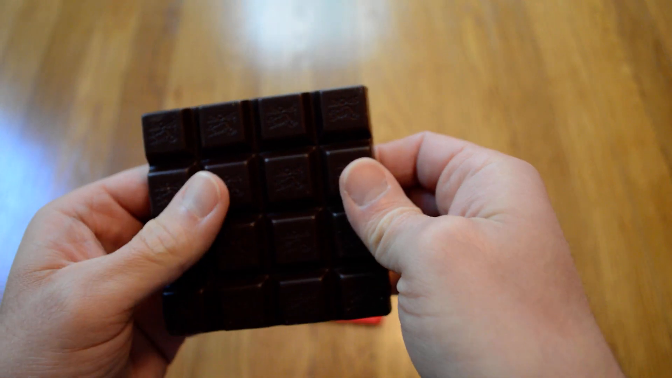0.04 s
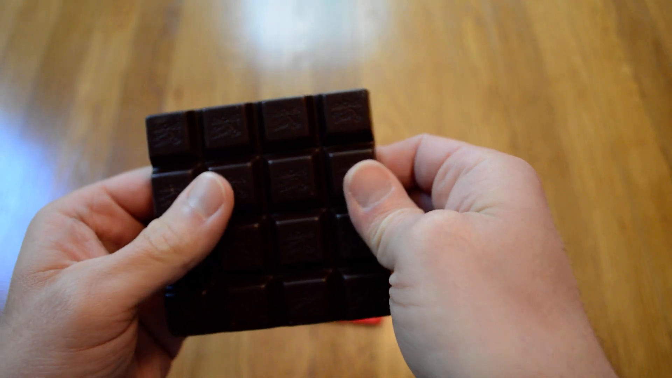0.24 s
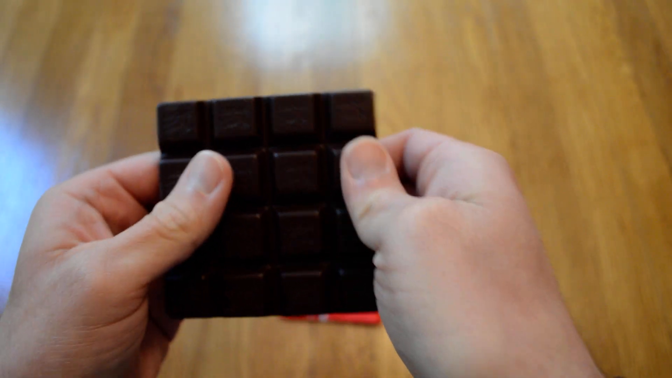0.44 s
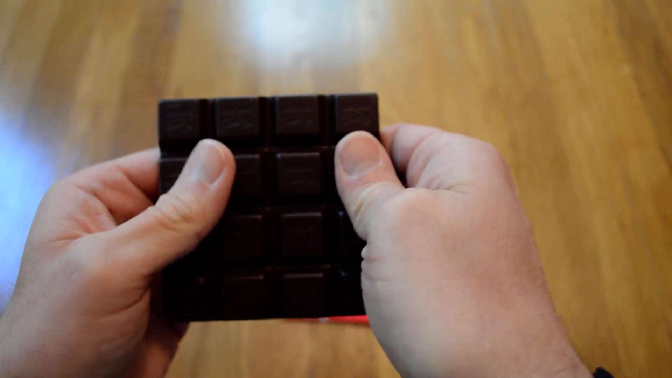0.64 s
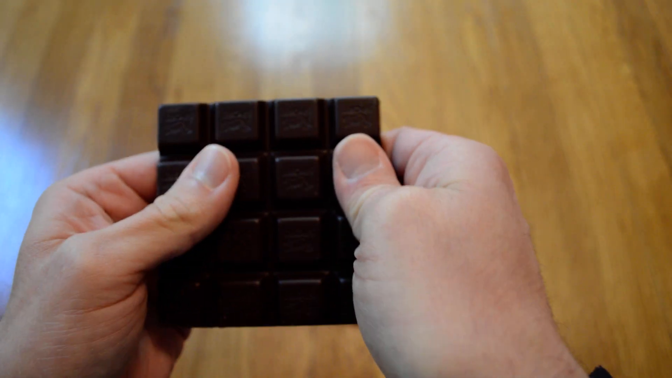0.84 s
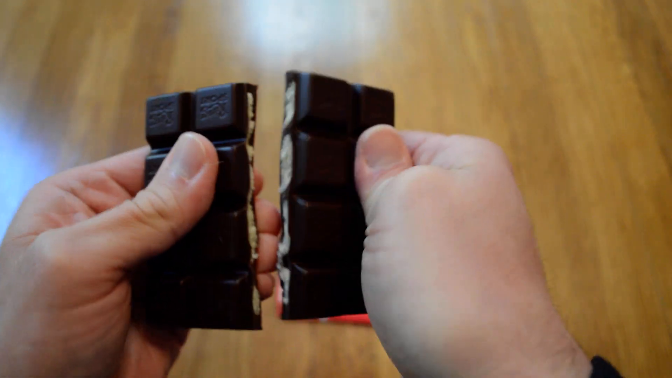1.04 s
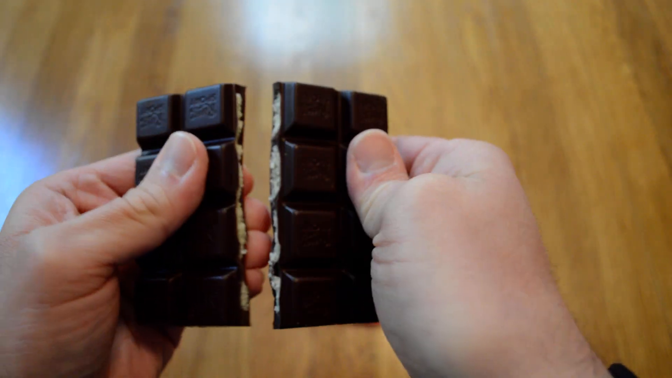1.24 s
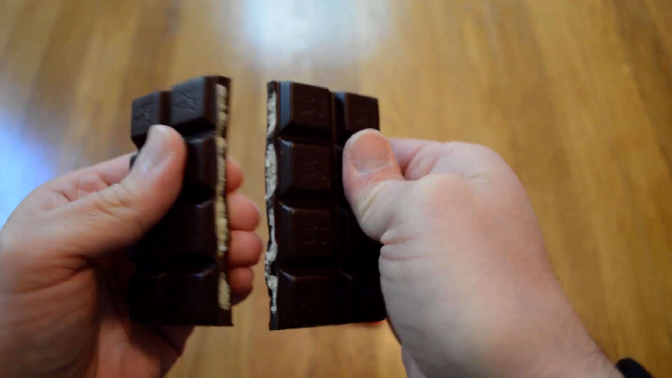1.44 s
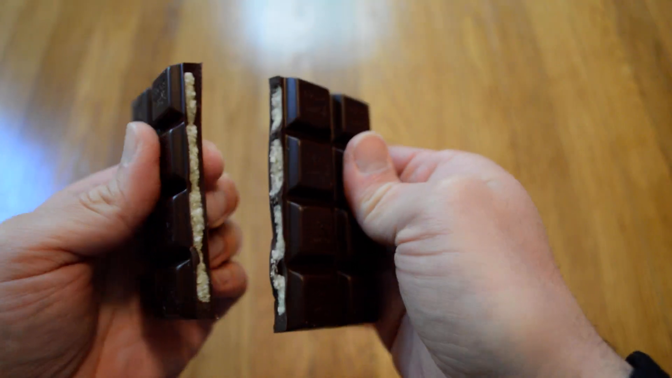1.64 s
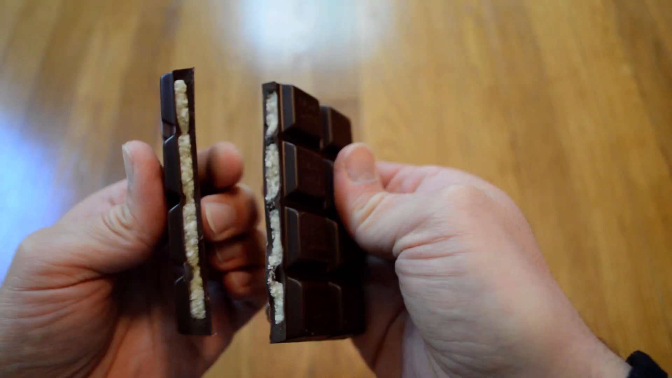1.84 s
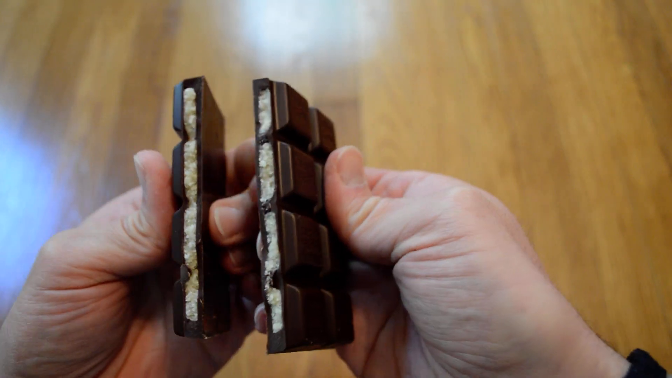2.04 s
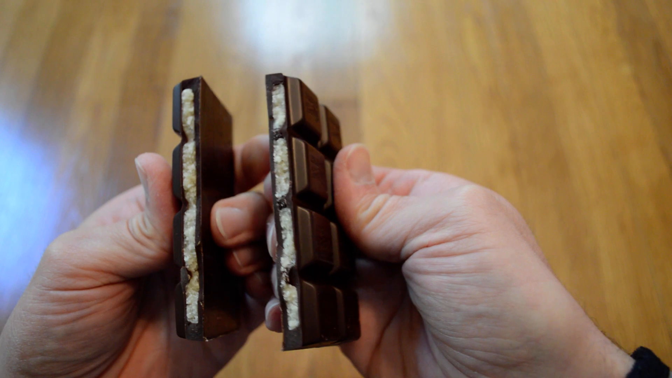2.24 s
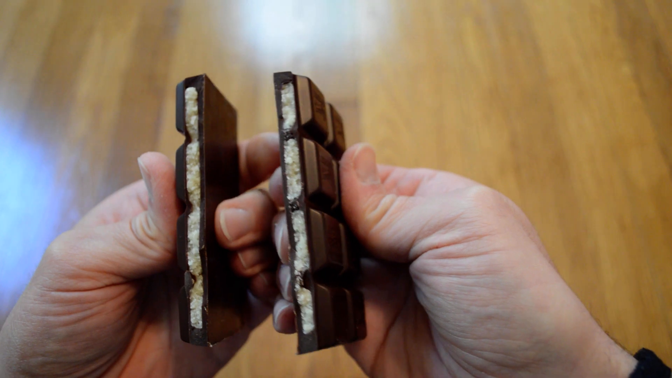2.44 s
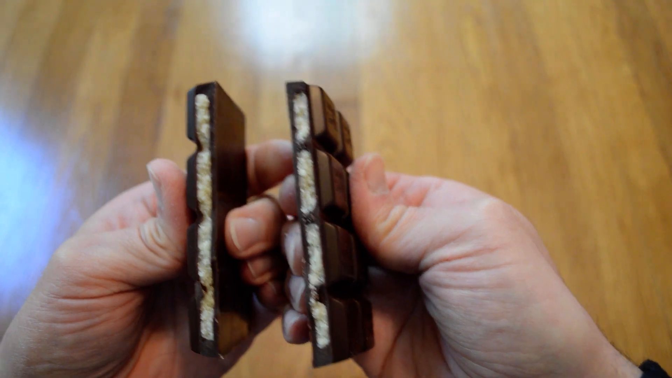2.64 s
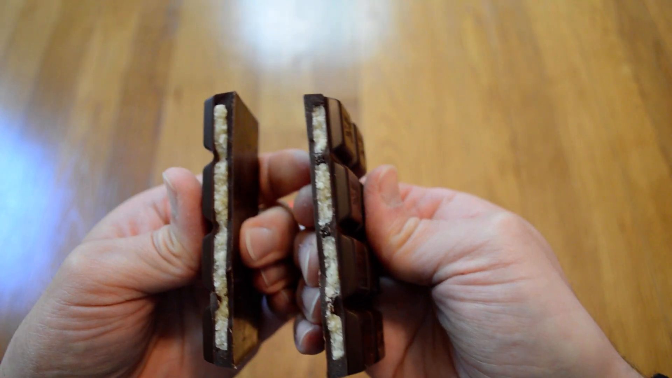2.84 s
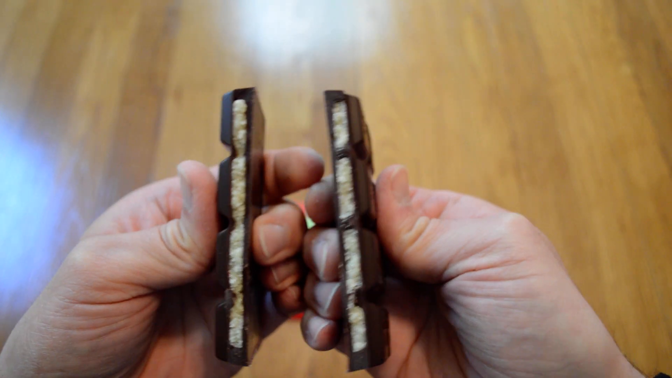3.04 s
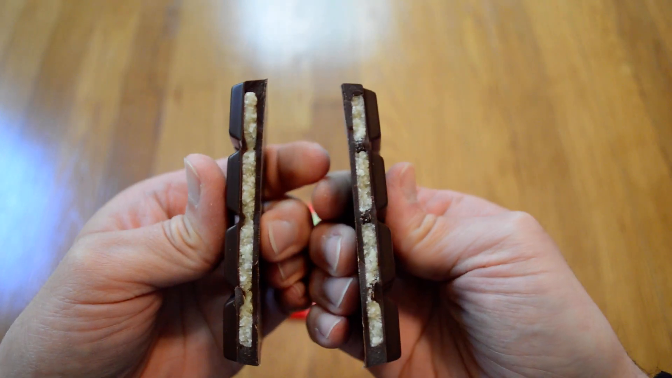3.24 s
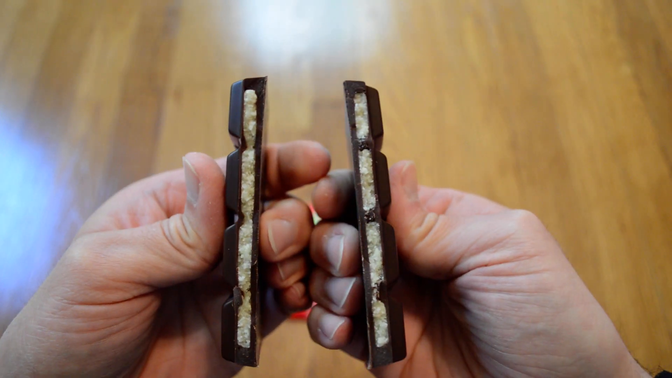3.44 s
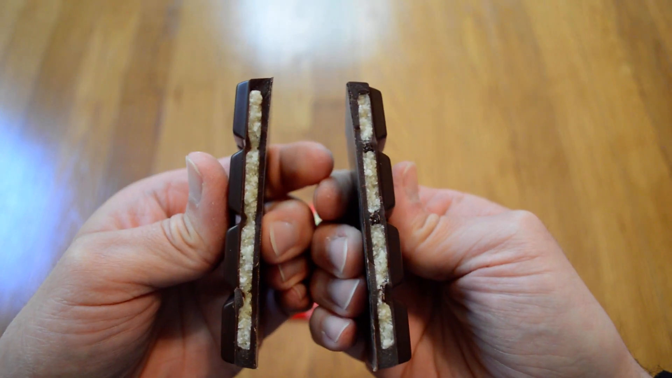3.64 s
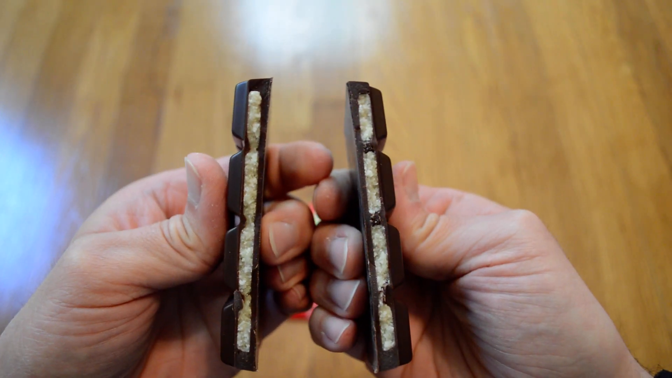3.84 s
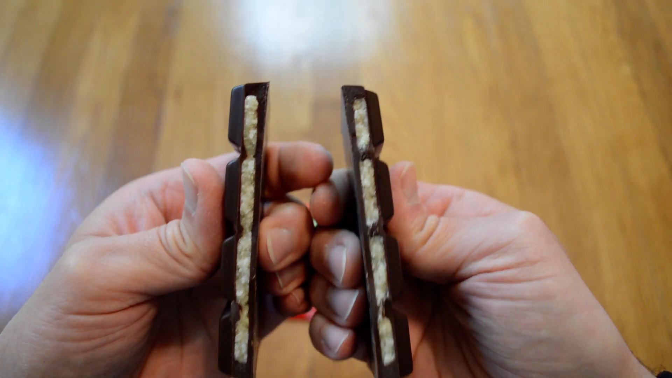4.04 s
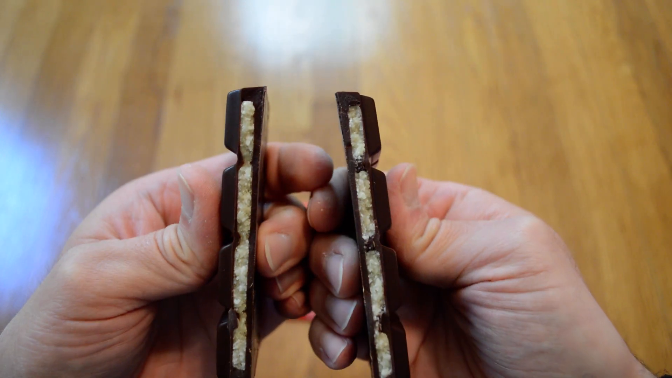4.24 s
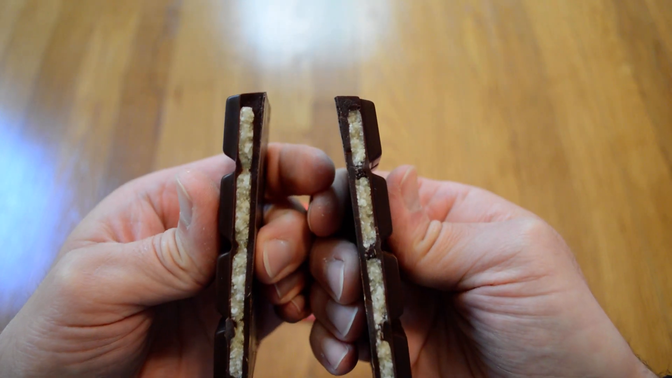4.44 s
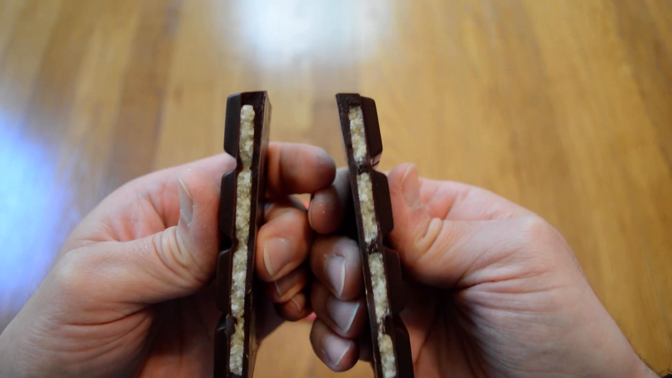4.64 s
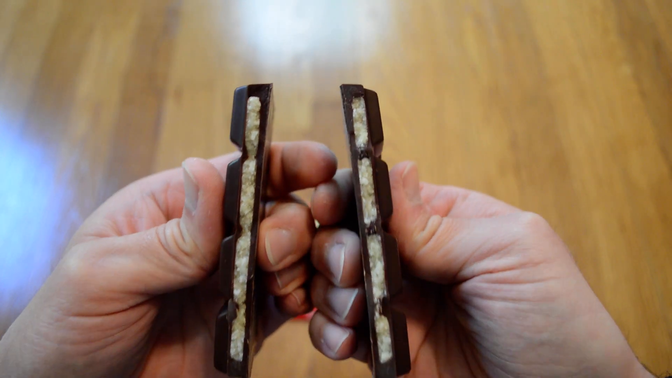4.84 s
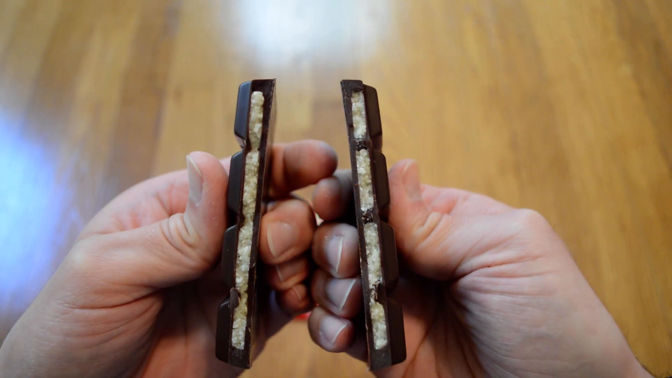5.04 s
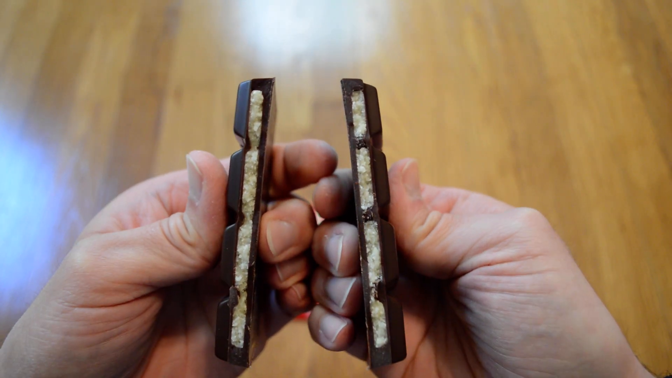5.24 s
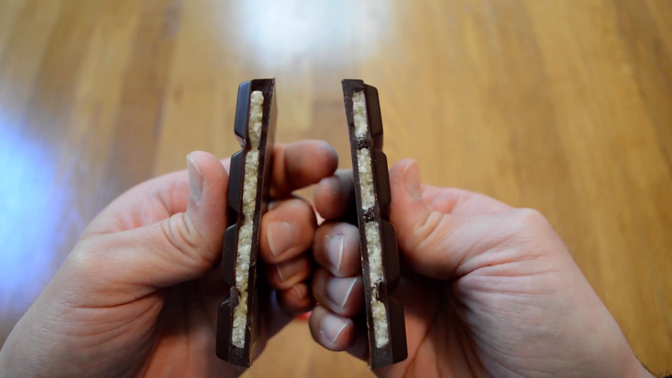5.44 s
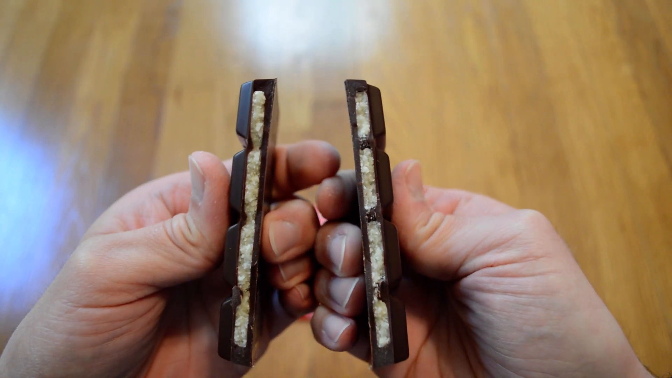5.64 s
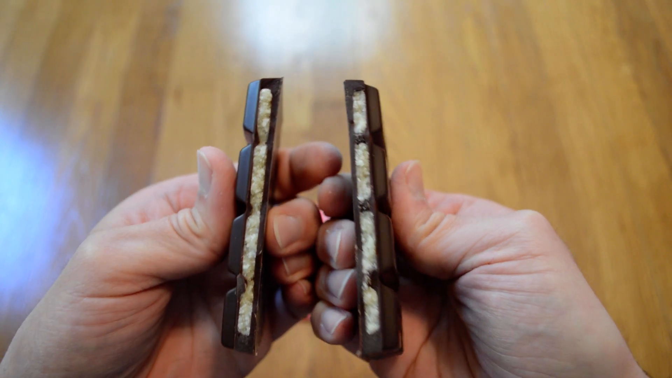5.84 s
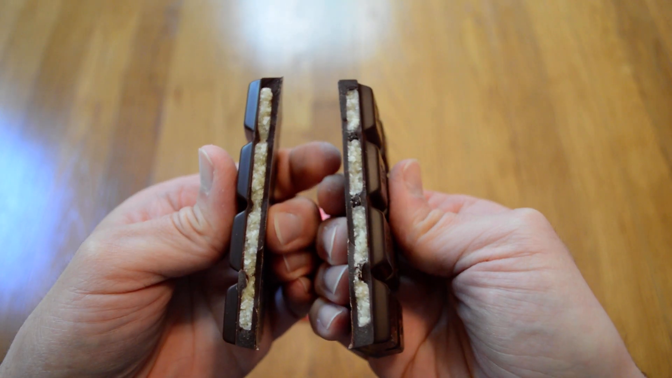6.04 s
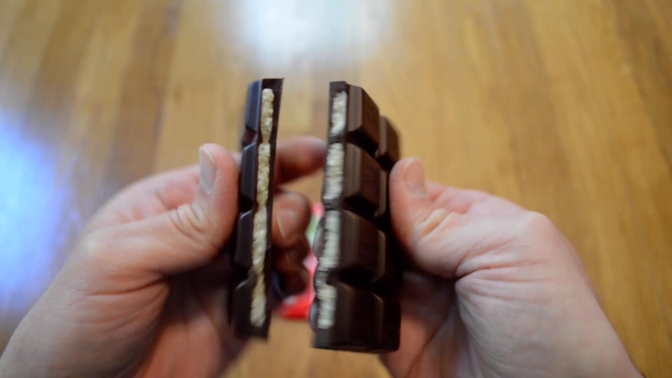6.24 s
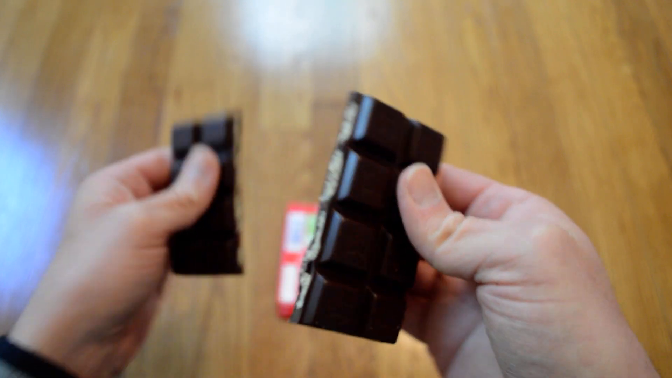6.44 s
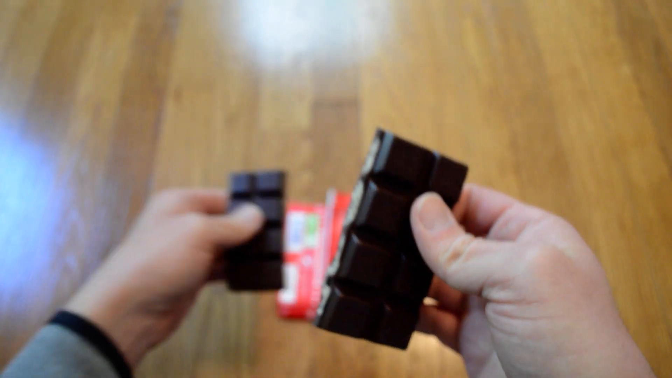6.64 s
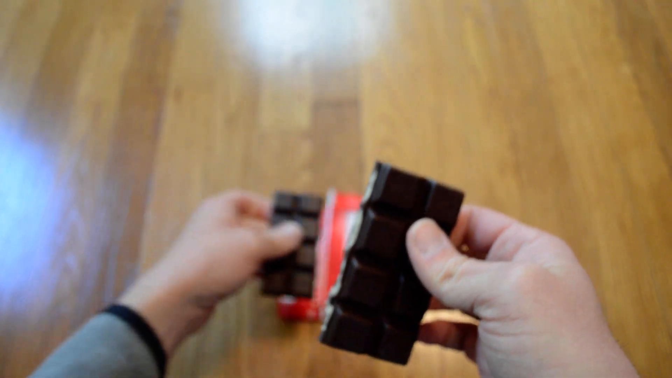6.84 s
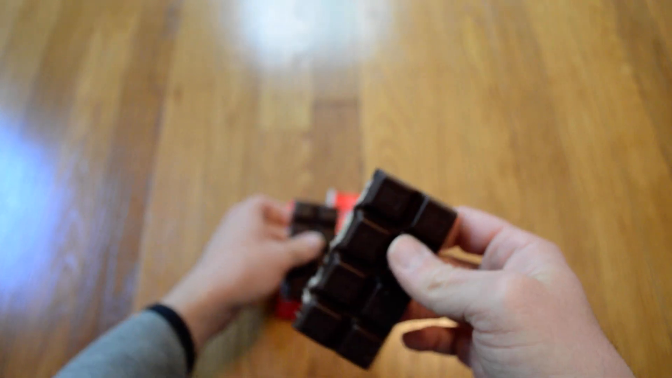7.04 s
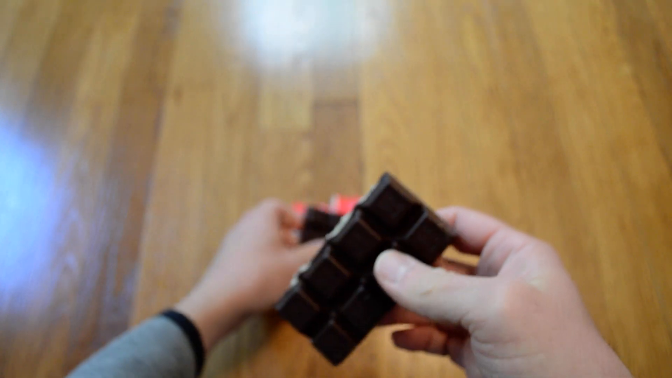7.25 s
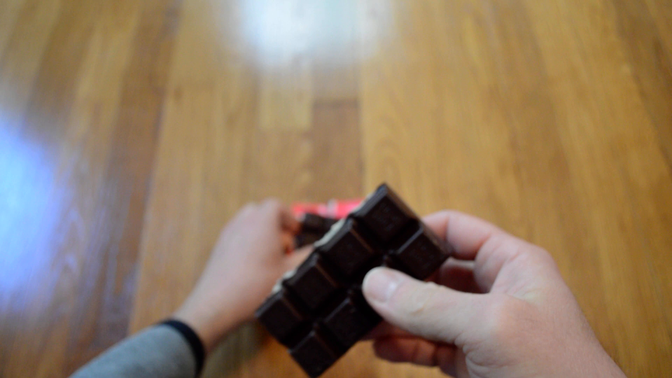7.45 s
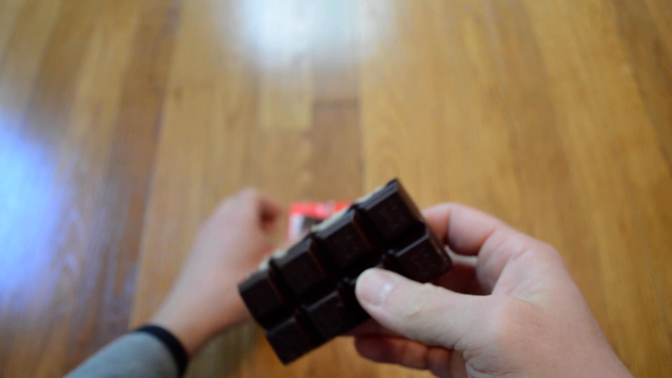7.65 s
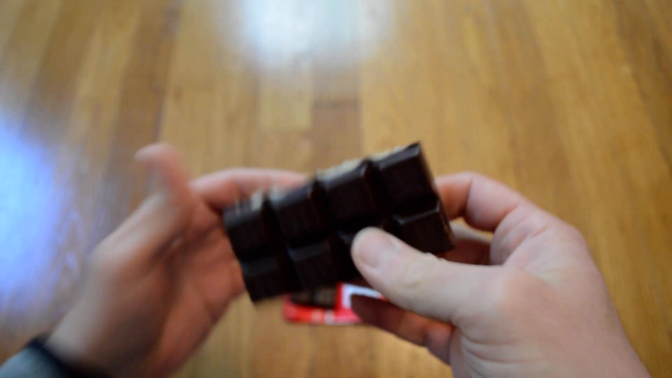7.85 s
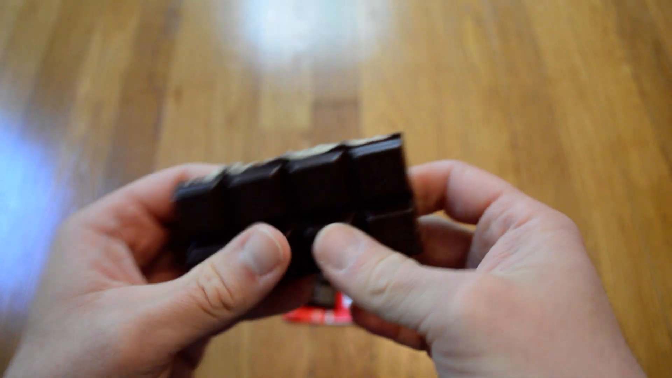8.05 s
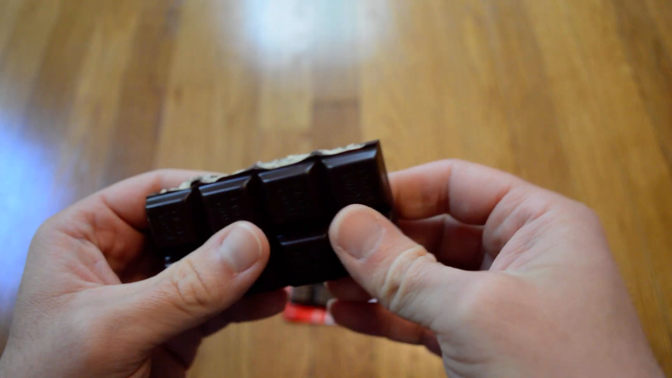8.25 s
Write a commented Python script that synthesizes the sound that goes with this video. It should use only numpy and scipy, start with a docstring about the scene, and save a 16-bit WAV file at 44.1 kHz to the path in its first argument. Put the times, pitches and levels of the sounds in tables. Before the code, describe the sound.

A chocolate bar snaps with one sharp crack, then a piece clacks down on its wrapper on a wooden table, over a faint motor hum.

```python
"""A fridge-like motor hums and whirrs throughout in a small room that answers each hit.
Near 1 s two hands bend a filled chocolate bar close to the microphone: it ticks, then snaps with one
sharp crack; a faint tick follows at 2.6 s. Near 7 s a sleeve swishes as one half is put down on its
wrapper on a wooden table, where it clacks, crinkles the wrapper, slides and rocks to rest.
The arm draws back, and two last faint ticks come just after 8 s."""
import sys
import numpy as np
from scipy import signal
from scipy.fft import rfft, irfft
from scipy.io import wavfile

SR = 44100
rng = np.random.default_rng(int(sys.argv[2]) if len(sys.argv) > 2 else 0)


def output_pcm(signal):
    """Save a mono or channel-first signal as 16-bit PCM at the path in sys.argv[1].

    Samples are clipped to [-1, 1] before scaling.
    """
    pcm = np.clip(np.atleast_2d(signal).T, -1, 1) * 32767
    wavfile.write(sys.argv[1], SR, np.round(pcm).astype(np.int16))


N = 366471
T = np.arange(N) / SR
RING_T = T[:SR // 8]
FREQS = np.maximum(np.arange(N // 2 + 1) * SR / N, 1)


def undb(db):
    """Decibels to gain."""
    return 10 ** (np.asarray(db) / 20)


def unit(x):
    """Scale to the energy of 1 ms at full level."""
    return x / np.sqrt(np.sum(x ** 2) * 1000 / SR)


def add(track, t_s, x):
    """Mix x in at t_s."""
    i = int(t_s * SR)
    track[i:i + len(x)] += x[:N - i]


def cut(x, hz, kind, order=2):
    """Low-pass or high-pass."""
    return signal.sosfilt(signal.butter(order, hz, kind, fs=SR, output="sos"), x)


def contour(points):
    """Gain per frequency from (f/Hz, level/dB) points."""
    hz, db = np.transpose(points)
    return undb(np.interp(np.log(FREQS), np.log(hz), db))


def noise(gain):
    """Noise of given amplitude per root Hz."""
    return irfft(rfft(rng.standard_normal(N)) * gain, N) * np.sqrt(SR / 2)


def walk(rate_hz):
    """Smooth random curve, rms 1."""
    x = noise(np.exp(-.5 * (FREQS / rate_hz) ** 2))
    return (x - x.mean()) / x.std()


def ticks(low_hz, high_hz, spread_db=5, limit_db=17):
    """Dense band-limited ticks of uneven size, rms 1."""
    x = rng.choice([-1, 1], N) * undb(np.minimum(spread_db * rng.exponential(size=N), limit_db))
    x = cut(cut(x, low_hz, "high", order=3), high_hz, "low", order=4)
    return x / x.std()


def tone(rms_db, cycles):
    """Sine at a given rms level."""
    return np.sqrt(2) * undb(rms_db) * np.sin(2 * np.pi * cycles)


def mode(hz, db, t60_s, t=RING_T):
    """One damped sine."""
    return undb(db - 60 * t / t60_s) * np.sin(2 * np.pi * hz * t)


def ring(modes, damping=1):
    """Modes struck together, sign flipping by pairs; damping blurs the peaks."""
    return unit(sum((-1) ** (k // 2) * mode(hz, db, t60_s / damping)
                    for k, (hz, db, t60_s) in enumerate(modes)))


def contact(x, hard_hz):
    """A softer contact builds more slowly and holds less treble."""
    return unit(cut(x * (1 - np.exp(-RING_T * hard_hz)), hard_hz, "low", order=3))


def stroke(t_s, half_s):
    """Bell-shaped speed of a movement, fastest at t_s."""
    return (1 + ((T - t_s) / half_s) ** 2 / 2) ** -2


# f/Hz, density/(dB per Hz)
ROOM_TONE = [(20, -100), (50, -87), (100, -86.5), (200, -82.5), (300, -85), (550, -87.5), (850, -93),
             (1600, -93), (2400, -95), (4200, -99), (7000, -101), (10000, -103), (15000, -104.3)]


def room_tone():
    """Steady, dull background noise."""
    return noise(contour(ROOM_TONE))


# f/Hz, width/Hz, relative level/dB
WHIRR_BANDS = [(700, 23, -81), (948, 16, -75.5), (1035, 32, -76), (1125, 40, -78), (1228, 46, -67.7),
               (1360, 25, -66.3), (1820, 45, -89), (1960, 95, -88.5), (3180, 50, -99), (5150, 70, -100),
               (5520, 110, -93.5), (6230, 100, -96), (12870, 120, -104)]


def motor_whirr(trim_db=-0.56):
    """Noise in the motor's resonances swells and flutters, the high ones least."""
    flutter_db = 0.7 * walk(rate_hz=4) + 2.3 * walk(rate_hz=70)
    out = np.zeros(N)
    for hz, width_hz, db in WHIRR_BANDS:
        band = noise(undb(db) * np.exp(-(FREQS - hz) ** 2 / (2 * width_hz) ** 2))
        out += band * undb(flutter_db * min(1, 1400 / hz) + trim_db)
    return out


# f/Hz, rms level/dB
MOTOR_TONES = [(59.2, -71), (75.4, -68), (96, -84), (127.5, -77.5), (177.6, -64.5), (202.8, -58),
               (236.9, -62.5), (255, -78.5), (296, -98), (355.2, -77), (383.5, -69.5), (415.5, -72.5),
               (592, -78.5), (770.5, -69.5), (830, -69), (1483, -72)]


def motor_hum():
    """The motor's tones waver together in level and pitch."""
    sway_db = 0.67 * walk(rate_hz=2.9)
    drift_s = np.cumsum(0.00081 * walk(rate_hz=0.98)) / SR
    return sum(tone(db + sway_db, hz * (T + drift_s) + rng.random()) for hz, db in MOTOR_TONES)


def electrics(mains_hz=120, rise_db_per_s=0.7, whine_hz=15713):
    """Mains hum creeps up under a thin, steady electronic whine."""
    return tone(-67.5 + rise_db_per_s * T, mains_hz * T) + tone(-67, whine_hz * T)


# modes of the held bar, the unbroken bar and the hands: f/Hz, relative level/dB, t60/s
BAR_MODES = [(453, -13, 0.014), (850, -2.5, 0.0091), (1450, -5.5, 0.013), (2087, -7.5, 0.016),
             (2340, -21, 0.038), (3180, -1.5, 0.0083), (4180, -10.5, 0.012), (4697, -4, 0.0037),
             (6330, -1, 0.0029), (6900, -4.5, 0.0083), (8060, -7.5, 0.0087), (8700, -12, 0.018),
             (9750, -4.5, 0.0095), (10600, -11, 0.0054), (11695, -21.1, 0.0132), (13300, -11.3, 0.0068),
             (14975, -19, 0.0071)]
UNBROKEN_MODES = [(2580, 0, 0.011)]
HAND_MODES = [(88, 1, .14), (175, 0, 0.065), (270, -10, 0.036)]
# t/s, level/dB, high cut/Hz, low cut/Hz, relative unbroken ring/dB
FRACTURES = [(0.9223, -29, 12000, 900, -7), (0.9452, -42, 3500, 2000, 5), (0.9642, -30, 11000, 1200, -4),
             (0.9790, -12, 18000, 248, -28), (2.6193, -41, 10000, 1600, -4), (8.0700, -48, 8000, 2000, -14),
             (8.148, -52, 6000, 1500, -12)]


def cracks(crumble_t60_s=0.012):
    """Each fracture rings the bar, jolts the hands and spills a bright click into the room."""
    direct, spill = np.zeros(N), np.zeros(N)
    click = signal.unit_impulse(len(RING_T))
    for t_s, db, high_hz, low_hz, unbroken_db in FRACTURES:
        crumble = unit(rng.standard_normal(len(RING_T)) * undb(-60 * RING_T / crumble_t60_s))
        crack = ring(BAR_MODES) + undb(-16) * crumble + undb(unbroken_db) * ring(UNBROKEN_MODES)
        for track, sound in (direct, crack), (spill, click):
            band = cut(cut(sound, high_hz, "low"), low_hz, "high")
            add(track, t_s, undb(db) * unit(band))
        add(direct, t_s + 0.0033, undb(db - 26) * contact(ring(HAND_MODES), hard_hz=400))
    return direct, spill


# f/Hz, echo level/dB, t60/s
ROOM_DECAY = [(150, 7.5, 0.24), (400, -15.5, 0.62), (880, 1, 0.21), (1990, -6.5, 0.32), (4440, -6.5, 0.35),
              (8000, -10.5, 0.35), (14000, -5, .22)]


def room(x, gap_s=0.007):
    """Diffuse echoes follow a short gap; each half octave dies at its own rate."""
    t, response = T[:SR * 2 // 3], 0
    hz, db, t60_s = np.transpose(ROOM_DECAY)
    for low_hz in 90 * 2 ** np.arange(0, 7.5, .5):
        log_centre = np.log(low_hz) + np.log(2) / 4
        fade_per_s = np.log(1000) / np.interp(log_centre, np.log(hz), t60_s)
        gain = undb(np.interp(log_centre, np.log(hz), db)) * np.sqrt(2 * fade_per_s / SR)
        sos = signal.butter(3, [low_hz, low_hz * np.sqrt(2)], "band", fs=SR, output="sos")
        band = signal.sosfilt(sos, rng.standard_normal(len(t)))
        response += gain * band * np.exp(-fade_per_s * t)
    return signal.fftconvolve(x, np.pad(response, (int(gap_s * SR), 0)))[:N]


# f/Hz, relative density/dB
CLOTH_SPECTRUM = [(200, -11), (800, 1.5), (2000, -1.5), (3500, -5), (6000, -9), (10000, -11),
                  (13000, -15.5), (16000, -28)]
# reach, lower, draw back: t/s, half length/s, level/dB
ARM_STROKES = [(6.864, 0.37, -54.5), (7.433, 0.15, -49), (7.893, 0.2, -53.5)]


def sleeve(flutter_db=1.0):
    """Cloth rubs with a fine flutter, louder as the arm moves faster."""
    rub = noise(contour(CLOTH_SPECTRUM))
    envelope = sum(undb(db) * stroke(t_s, half_s) for t_s, half_s, db in ARM_STROKES)
    return rub / rub.std() * envelope * undb(flutter_db * walk(rate_hz=40))


# half bar on the table: f/Hz, relative level/dB, t60/s
PIECE_MODES = [(1330, -5, 0.01), (1650, -3.5, 0.011), (2116, -1.5, 0.023), (2380, -10, 0.02),
               (3040, 5, 0.0054), (3400, -4, 0.011), (4050, -6.5, 0.013), (4450, -6, 0.013),
               (5700, -8, 0.0088), (6340, 1.5, 0.0043), (8000, -10, 0.004), (7730, 2, 0.005),
               (10000, -2.5, 0.0047), (11400, 1.5, 0.0022), (14197, -8, 0.0051)]
# t/s, level/dB, hardness/Hz, spot ring/Hz, relative spot level/dB
LANDINGS = [(7.1959, -19.5, 620, 1070, 15), (7.2639, -15.5, 13000, 2580, -27),
            (7.3292, -16, 12000, 1880, -1), (7.3370, -20.5, 4830, 1000, -6), (7.5536, -31, 4500, 3440, -12),
            (7.5632, -31, 3500, 3000, -11), (7.5716, -28, 9100, 3170, -12), (7.5840, -24.5, 2420, 797, 3),
            (7.5883, -16.5, 5260, 1390, -2), (7.595, -26.5, 6500, 4930, 2), (7.6232, -20.5, 2380, 1255, 0),
            (7.638, -32, 2000, 1310, 5)]


def clacks():
    """Each landing rings the half bar and the touched spot; the spill into the room has blunter peaks."""
    direct, spill = np.zeros(N), np.zeros(N)
    for t_s, db, hard_hz, spot_hz, spot_db in LANDINGS:
        spot = contact(ring([(spot_hz, 0, 19 / spot_hz)]), 1.34 * spot_hz)
        spot = undb(spot_db) * cut(spot, spot_hz / 2, "high")
        unshielded = min(1, hard_hz / 2600)  # cushioning fingers also shield it from the room
        for track, damping, share in (direct, 1, 1), (spill, 2.2, unshielded):
            body = contact(ring(PIECE_MODES, damping), hard_hz)
            body = unit(cut(body, min(hard_hz / 2, 900), "high", order=4))  # too small to radiate bass
            add(track, t_s, share * undb(db) * unit(body + spot))
    return direct, spill


def table_reflection(x, delay_s=0.00088, echo_db=-6, scatter_s=0.00087):
    """The sound plus its treble thrown back by the table, scattered by hand and wrapper."""
    scatter = rng.standard_normal(len(RING_T)) * np.exp(-RING_T / scatter_s)
    echo = np.zeros(N)
    add(echo, delay_s, signal.fftconvolve(x, scatter / np.linalg.norm(scatter)))
    return (x + undb(echo_db) * cut(echo, 2600, "high")) / np.hypot(1, undb(echo_db))


# f/Hz, relative level/dB, t60/s
TABLE_MODES = [(127, -9.5, 0.081), (241, -1, 0.049), (416, 9.5, 0.029), (516, 4, 0.038), (750, -1, 0.031)]
# t/s, level/dB, hardness/Hz
TABLE_HITS = [(7.1967, -29, 900), (7.2063, -32.5, 700), (7.3366, -26.5, 710)]


def thuds():
    """The weight of the piece rings the table top's low modes."""
    out = np.zeros(N)
    for t_s, db, hard_hz in TABLE_HITS:
        add(out, t_s, undb(db) * contact(ring(TABLE_MODES), hard_hz))
    return out


# f/Hz, relative level/dB, t60/s
SURFACE_MODES = [(1530, -7, 0.29), (1630, 4, 0.17), (1786, -1, 0.19), (1800, 1, 0.16), (1944, -2.5, 0.29),
                 (2094, -7, 0.27), (2250, -7, 0.25), (2550, 3, 0.18), (3145, -5, 0.25)]


def surface_ring(x, gain_db=-17.5):
    """The hard surface under the wrapper rings faintly when struck or scraped."""
    response = sum(mode(hz, db, t60_s, T[:SR // 2]) for hz, db, t60_s in SURFACE_MODES)
    return undb(gain_db) * signal.fftconvolve(x, response / np.linalg.norm(response))[:N]


# t/s, fade/s, level/dB, high cut/Hz
WRAPPER_PRESSES = [(7.2686, 0.0038, -31, 11000), (7.279, 0.005, -30, 9400), (7.293, 0.022, -46, 10500),
                   (7.345, 0.025, -44, 7500)]


def crinkles(attack_s=0.0013, low_hz=5300, crackle_db=2):
    """The piece presses the wrapper, whose folds give way one after another."""
    out = np.zeros(N)
    for t_s, fade_s, db, high_hz in WRAPPER_PRESSES:
        age_s = np.maximum(T - t_s, 0)
        envelope = (1 - np.exp(-age_s / attack_s)) * np.exp(-age_s / fade_s)
        out += undb(db) * envelope * ticks(low_hz, high_hz)
    return out * undb(crackle_db * walk(rate_hz=250))


# f/Hz, relative density/dB
WRAPPER_SPECTRUM = [(2000, -30), (4800, -8), (6000, 4), (7600, -6), (9200, -6), (11200, -8), (12800, -14),
                    (16000, -24)]
# t/s, half length/s, rasp/dB, hiss/dB
SLIDE_STROKES = [(7.433, 0.018, -51, -47), (7.469, 0.019, -44.5, -61), (7.6, 0.031, -46, -51)]


def slides():
    """The sliding piece rasps and the wrapper hisses under it."""
    rasp = ticks(low_hz=1090, high_hz=2960)
    hiss = noise(contour(WRAPPER_SPECTRUM))
    hiss /= hiss.std()
    return sum(stroke(t_s, half_s) * (undb(rasp_db) * rasp + undb(hiss_db) * hiss)
               for t_s, half_s, rasp_db, hiss_db in SLIDE_STROKES)


def scene():
    """The bar breaks close by; the table is further off and carries more room."""
    background = room_tone() + motor_whirr() + motor_hum() + electrics()
    snap, snap_spill = cracks()
    clack, clack_spill = clacks()
    thud = thuds()
    table_spill = clack_spill + undb(1.5) * thud
    wrapper = crinkles() + slides()
    table = table_reflection(clack + thud) + surface_ring(table_spill + wrapper)
    snap_spill = cut(snap_spill, 5600, "low", order=1)
    echoes = room(undb(0.7) * snap_spill + undb(0.5) * table_spill + undb(1) * wrapper)
    return (background + snap + echoes + sleeve() + table + wrapper)[None]


def record(dry, top_hz=15900):
    """A steep low-pass cuts the top."""
    return signal.sosfilt(signal.ellip(12, .2, 70, top_hz, fs=SR, output="sos"), dry)


dry = scene()
out = record(dry)
output_pcm(out)
```